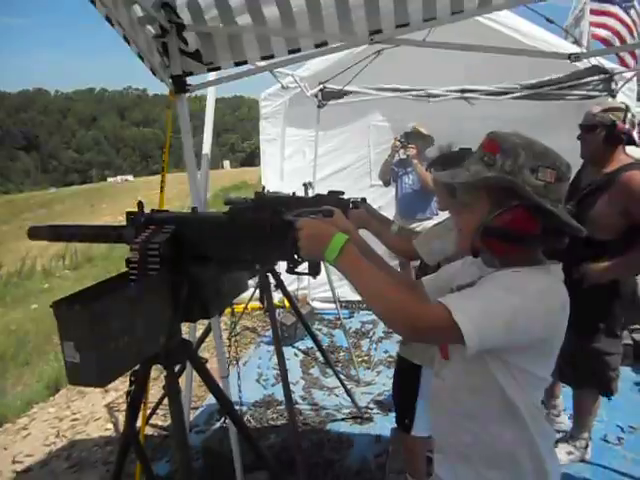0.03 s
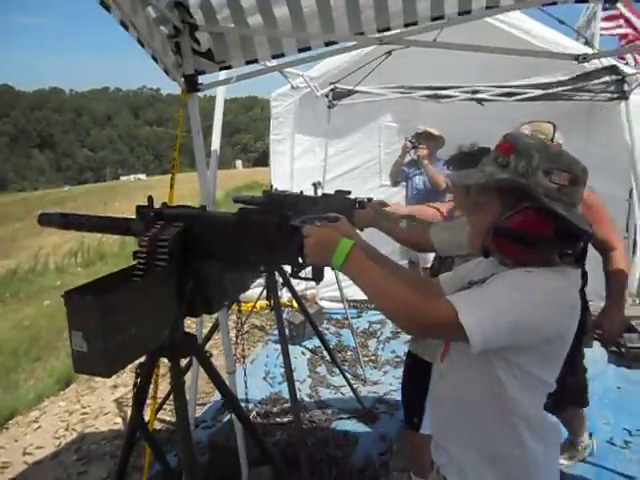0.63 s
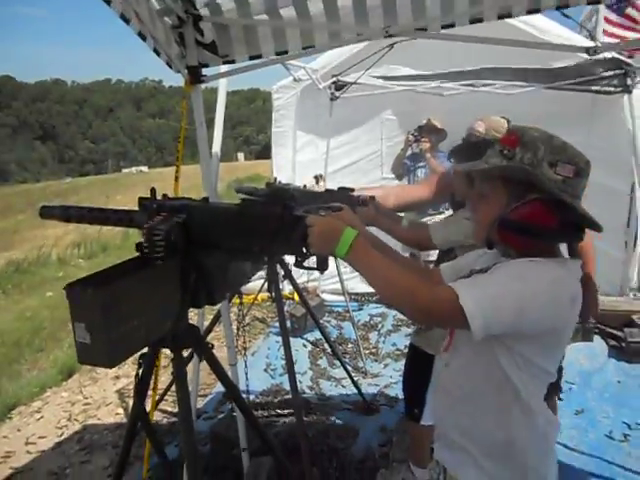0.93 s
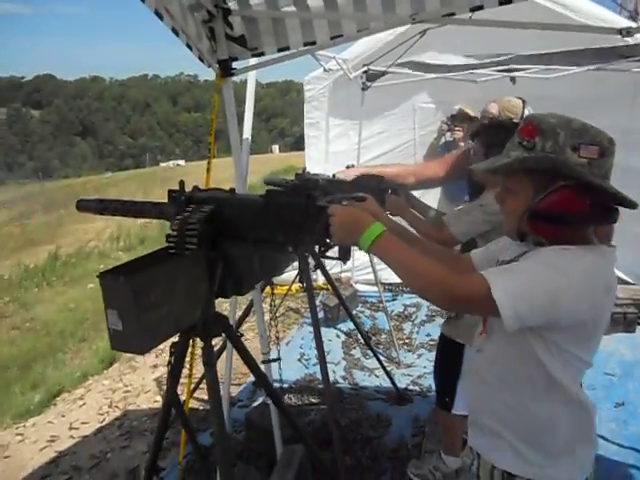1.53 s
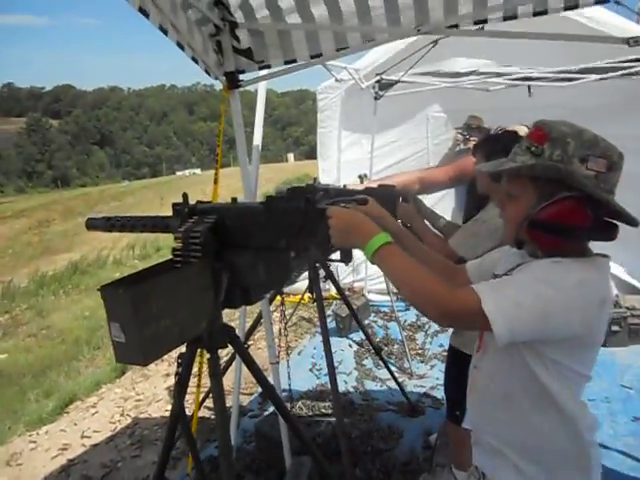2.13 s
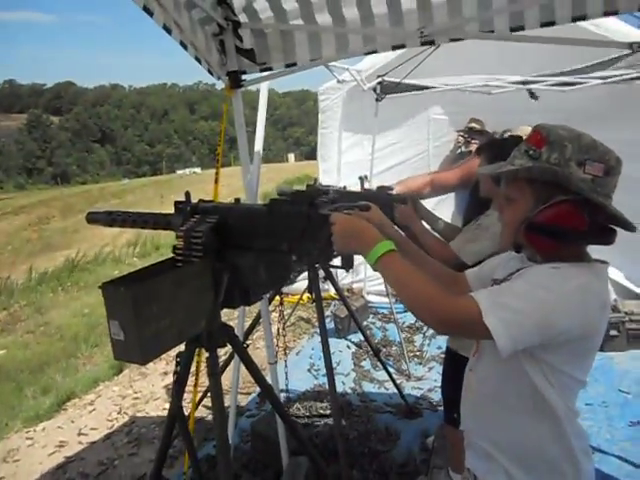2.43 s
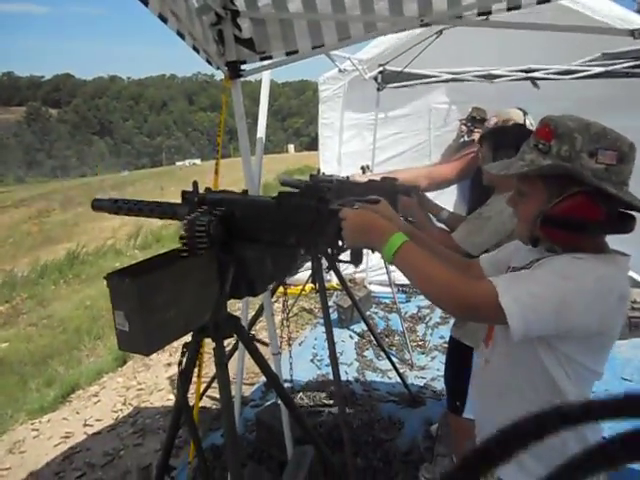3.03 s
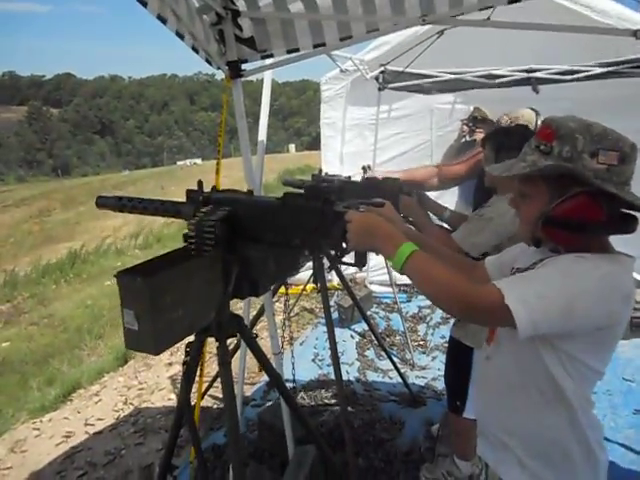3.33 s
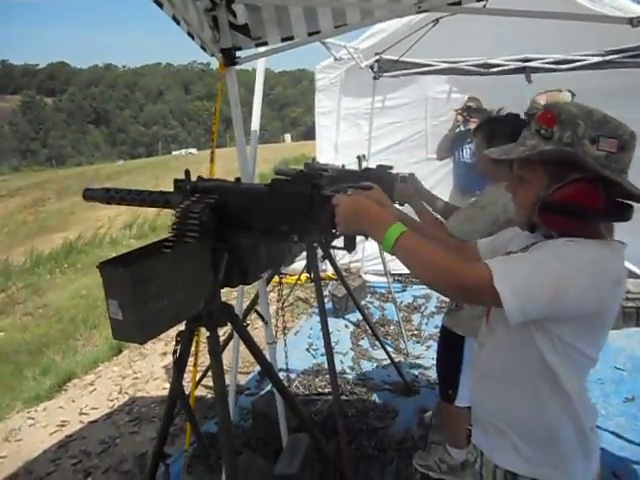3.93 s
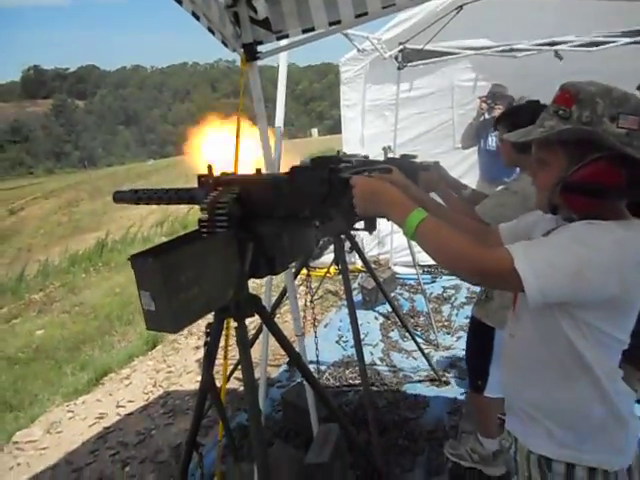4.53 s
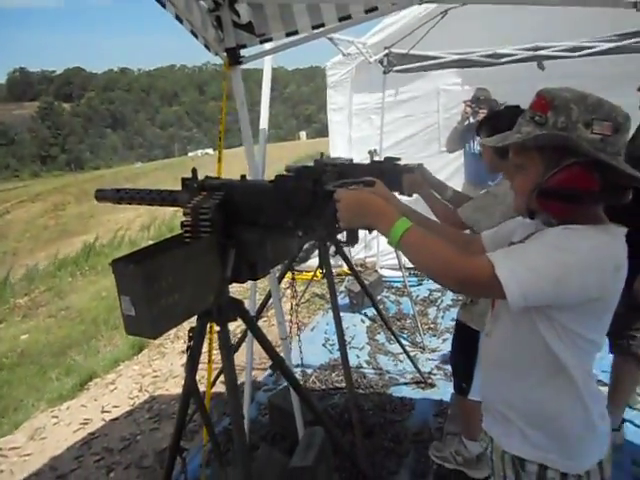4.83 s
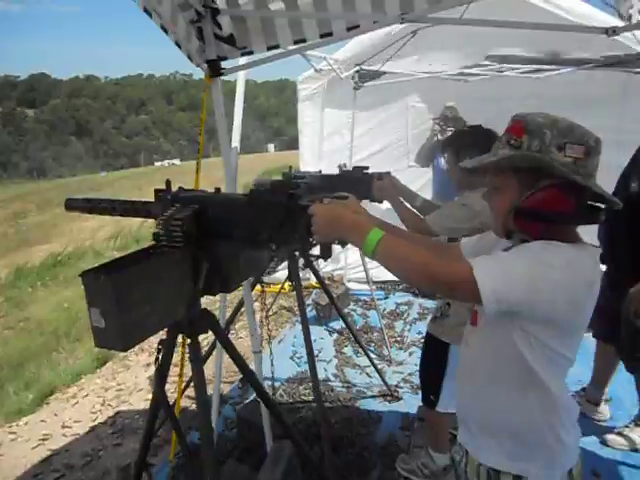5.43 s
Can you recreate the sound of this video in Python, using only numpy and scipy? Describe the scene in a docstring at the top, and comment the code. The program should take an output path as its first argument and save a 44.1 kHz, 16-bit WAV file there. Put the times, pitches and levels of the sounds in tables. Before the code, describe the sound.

A close machine gun fires three harsh, distorted bursts outdoors, a faster gun joining in, with wind buffeting the microphone between bursts.

```python
"""An open firing range, under a canopy, heard through a small camera microphone near a belt-fed machine
gun. It fires three bursts; late in the second, a faster gun down the line joins in. Every blast scatters
off ground, tents and hillside and overloads the microphone into a flat, harsh bark. Wind buffets the
microphone between bursts, spent brass clinks, and the feed squeaks just before each follow-up round."""
import sys
import numpy as np
from scipy import signal
from scipy.fft import rfft, irfft, next_fast_len
from scipy.io import wavfile
from scipy.ndimage import uniform_filter1d, map_coordinates

SR = 44100
rng = np.random.default_rng(int(sys.argv[2]) if len(sys.argv) > 2 else 0)


def wrap_up_sound(samples):
    """Save the sound to the file named by the first command line argument, as 16-bit audio."""
    columns = np.atleast_2d(samples).T
    # keep every value between -1 and 1, then stretch to whole-number steps
    tamed = np.clip(columns, -1, 1)
    steps = np.round(tamed * 32767).astype(np.int16)
    wavfile.write(sys.argv[1], SR, steps)


N = 245637


def amp(db):
    """Decibels to gain."""
    return 10 ** (np.asarray(db) / 20)


def gain_at(points, hz):
    """Gain of (Hz, dB) points joined on a log axis."""
    f, db = np.transpose(points)
    return amp(np.interp(np.log(hz + 1), np.log(f + 1), db))


def wobble(rate):
    """A smooth random curve, rate knots a second."""
    return map_coordinates(rng.standard_normal(int(N * rate / SR) + 4), [np.arange(N) * rate / SR])


def noise(spectrum, size=N):
    """Coloured noise of rms 1."""
    colour = gain_at(spectrum, np.fft.rfftfreq(size, 1 / SR))
    x = irfft(rfft(rng.standard_normal(size)) * colour, size)
    return x / np.sqrt(np.mean(x ** 2) + 1e-20)


def add(track, s, sound):
    """Mix a sound into the track at s seconds."""
    start = max(round(s * SR), 0)
    part = track[start:start + len(sound)]
    part += sound[:len(part)]


# The air over the range. Each row: frequency in Hz, relative level in dB.
AIR_SPECTRUM = [(100, 1), (1000, -2), (3000, -7.5), (6500, -11), (10000, -17), (13000, -35)]
def open_air():
    """A faint, wavering hiss all around."""
    return amp(-51.5 + 3.5 * wobble(8.7)) * noise(AIR_SPECTRUM)


# Wind on the microphone, deep and lumpy. Each row: frequency in Hz, relative level in dB.
WIND_RUMBLE = [(10, -35), (25, 5), (60, -8.5), (110, -12), (250, -39), (1000, -98)]
WIND_BUFFET = [(20, -14), (80, -9), (180, -2), (450, -9.5), (1200, -20), (3000, -33), (10000, -58)]
# Gusts. Each row: arrival in seconds, hold in seconds, relative rumble and buffet levels in dB.
WIND_GUSTS = [(0.086, 0.009, -24, -14), (0.157, 0.037, -11, -11.5), (0.231, 0.046, -17, -17),
              (0.337, 0.028, -18, -23.5), (1.114, 0.87, -29, -32.5), (2.053, 0.14, -29.5, -33),
              (2.359, 0.09, -24, -36.5), (2.605, 0.046, -19.5, -25.5), (2.712, 0.013, -18, -28),
              (3.555, 0.39, -36, -40)]
def wind(attack_s=0.018, release_s=0.015):
    """A light breeze blows on the microphone; gusts build, hold and die away over it."""
    t = np.arange(N) / SR
    breeze = amp(-35.5 + 1.5 * wobble(6.35))
    breeze *= noise(WIND_RUMBLE) + amp(-10.5 + 4.9 * wobble(60)) * noise(WIND_BUFFET)
    rumble = buffet = np.zeros(N)
    for s, hold, rumble_db, buffet_db in WIND_GUSTS:
        swell = np.exp(np.minimum(t - s, 0) / attack_s - np.maximum(t - s - hold, 0) / release_s)
        rumble = np.maximum(rumble, amp(rumble_db + 1) * swell)
        buffet = np.maximum(buffet, amp(buffet_db - 5) * swell)
    lumps = amp(1.7 * wobble(27) + 4 * wobble(110))
    return breeze + rumble * noise(WIND_RUMBLE) + buffet * lumps * noise(WIND_BUFFET)


# The swirl in an eddy. Each row: frequency in Hz, relative level in dB.
EDDY_SWIRL = [(20, -24), (110, -0.5), (250, 0.5), (520, -8.5), (1200, -16.5), (3000, -33), (10000, -51)]
# The hardest eddies. Each row: start in seconds, relative level in dB.
EDDY_HITS = [(0.086, -10.5), (0.162, -5), (0.175, -5), (0.22, -13.5), (0.27, -12), (0.341, -5.5),
             (2.136, -23), (2.427, -23.5)]
def eddies(rise_s=0.0058):
    """Single eddies shove the diaphragm: the pressure rises, then drops as each passes."""
    track, age = np.zeros(N), np.arange(SR // 8) / SR / rise_s
    envelope = age ** 2 * np.exp(1 - age ** 2)
    shove = 1 - age / 2
    for s, db in EDDY_HITS:
        add(track, s, amp(db - 3) * envelope * (noise(EDDY_SWIRL, len(age)) + shove))
    return track


# Gunfire from far off, direct or back from the hillside. Each row: frequency in Hz, relative level in dB.
DISTANT_SPECTRUM = [(30, -12), (200, 7.5), (600, 5.5), (1200, 1), (4500, 1), (9500, -6), (13000, -15)]
# Shots far down the firing line. Each row: start in seconds, relative level in dB.
FAR_SHOTS = [(0.04, -15.5), (0.0809, -13), (2.499, -30.5)]
def far_shots(t60=0.33):
    """Distance smears these shots into soft, quickly fading slaps."""
    track, t = np.zeros(N), np.arange(SR // 2) / SR
    envelope = amp(-5.5 - 60 * t / t60) * (1 - np.exp(-t / 0.0022))
    for s, db in FAR_SHOTS:
        add(track, s - .003, amp(db) * envelope * noise(DISTANT_SPECTRUM, len(t)))
    return track


# Modes of a brass case. Each row: frequency in Hz, relative level in dB, seconds to fade by 60 dB.
CASE_MODES = [(6175, 3, 0.11), (7100, -8, .1), (8650, -18, .1), (11100, 1, .18)]
# Cases and belt links landing. Each row: start in seconds, relative level in dB.
LANDINGS = [(0.0914, -36), (0.1424, -30), (1.8595, -23.5), (1.968, -38), (2.0767, -37), (2.222, -39),
            (2.279, -33.5), (2.609, -35)]
def spent_brass(tick_t60=0.088):
    """Each landing ticks and rings the brass at new strengths."""
    track, t = np.zeros(N), np.arange(SR // 4) / SR
    for s, db in LANDINGS:
        ring = np.zeros(len(t))
        for hz, mode_db, t60 in CASE_MODES:
            decay = amp(mode_db + rng.normal(0, 3.4) - 60 * t / t60)
            ring += decay * np.sin(2 * np.pi * hz * rng.normal(1, 0.0059) * t)
        tick = amp(-9 - 60 * t / tick_t60) * noise(CRACK_SPECTRUM, len(t))
        add(track, s, amp(db) * (amp(-18) * ring + tick))
    return track


def feed_squeaks(bursts, squeak_hz=6930, rise_s=0.009, lead_s=0.021):
    """Steel slides on steel as each next round is fed: a brief high note in a faint scrape."""
    track, t = np.zeros(N), np.arange(SR // 20) / SR
    stroke = (t / rise_s) ** 2 * np.exp(1 - (t / rise_s) ** 2)
    for burst in bursts:
        for s, _ in fire([burst])[1:]:
            note = np.sin(2 * np.pi * squeak_hz * rng.normal(1, .006) * t)
            scrape = amp(-3.5) * noise(CRACK_SPECTRUM, len(t))
            add(track, s - lead_s, amp(rng.normal(-31, 2.5)) * stroke * (note + scrape))
    return track


def fire(bursts):
    """(seconds, dB) of every round: each follows the last after one cycle of the action."""
    rounds = []
    for first, count, db, cycle in bursts:
        gaps = np.interp(np.linspace(0, 1, count - 1), np.linspace(0, 1, len(cycle)), cycle)
        rounds += [(s, db) for s in first + np.append(0, np.cumsum(gaps))]
    return rounds


# A shot's bright crack, also the colour of ticks and scrapes. Each row: frequency in Hz, relative dB.
CRACK_SPECTRUM = [(30, -14), (200, -15.5), (1000, -7.5), (2500, -1.5), (5000, 0.5), (9500, 0.5),
                  (13000, -10)]
def blasts(rounds, echo_spectrum, crack_db, crack_t60, echo_db, echo_t60,
           hill_t60, slap_delay_s, slap_db, alike):
    """Each round: a crack, dense echoes off ground and tents, one dull slap and the hillside's answer."""
    track, t, late = np.zeros(N), np.arange(SR // 4) / SR, np.arange(SR) / SR
    crack = amp(crack_db - 60 * t / crack_t60)
    echoes = amp(echo_db - 60 * t / echo_t60) * (1 - np.exp(-t / 0.0096))
    hill = amp(-20.5 - 60 * late / hill_t60) * (1 - np.exp(-late / 0.05))
    dull = noise([(100, 5.5), (400, 4), (900, -7.5), (2000, -43), (10000, -19)], len(t))
    slap = amp(slap_db - 60 * t / 0.053) * dull
    for envelope, spectrum in ((crack, CRACK_SPECTRUM), (echoes, echo_spectrum)):
        # the surroundings stand still, so part of the pattern repeats from round to round
        same = np.sqrt(alike) * noise(spectrum, len(t))
        for s, db in rounds:
            fresh = np.sqrt(1 - alike) * noise(spectrum, len(t))
            add(track, s, amp(db) * envelope * (same + fresh))
    for s, db in rounds:
        add(track, s + slap_delay_s, amp(db) * slap)
        add(track, s, amp(db) * hill * noise(DISTANT_SPECTRUM, len(late)))
    return track * amp(0.78 * wobble(260))  # echoes arrive in clumps


# The faster gun's dense echoes. Each row: frequency in Hz, relative level in dB.
FAST_ECHOES = [(30, -7), (130, -4.5), (220, 4), (320, -8), (460, 0), (850, -1), (1300, 0), (1600, -1.5),
               (2150, 2), (2800, -1.5), (4500, -3), (9500, -6), (13000, -22)]
# Its burst. Each row: start in seconds, rounds, relative level in dB, seconds per round from start to end.
FAST_FIRE = [(3.9935, 24, 0.3, [.0689, .0632, .0671, .0665, .0698, .0636])]
def fast_gun():
    """Down the line, one long burst at about 900 rounds a minute."""
    return blasts(fire(FAST_FIRE), FAST_ECHOES, crack_db=8.5, crack_t60=0.046, echo_db=5, echo_t60=0.1,
                  hill_t60=0.76, slap_delay_s=0.036, slap_db=-19, alike=0.23)


# The near gun's dense echoes. Each row: frequency in Hz, relative level in dB.
NEAR_ECHOES = [(30, -2), (135, -5), (192, 5), (255, -5.5), (400, -3), (600, -0.5), (1250, -1), (1700, -3),
               (2400, -1), (4500, -3.5), (9500, -9), (13000, -14)]
# Its bursts. Each row: start in seconds, rounds, relative level in dB, seconds per round as it drifts.
NEAR_FIRE = [(0.3759, 12, -2, [.1234, .1277, .1259, .128, .1188, .1258]),
             (2.7269, 12, -2.3, [.1271, .1299, .1295, .1262, .131, .1329]), (4.899, 6, -2.5, [.1251])]
def near_gun():
    """Close to the microphone, the belt-fed gun cracks out about 470 rounds a minute."""
    return blasts(fire(NEAR_FIRE), NEAR_ECHOES, crack_db=18.5, crack_t60=0.054, echo_db=9.5,
                  echo_t60=0.11, hill_t60=0.54, slap_delay_s=0.06, slap_db=-17.5, alike=0.19)


def scene():
    """The weather, the far end of the range and both guns, from one spot under the canopy."""
    background = open_air() + wind() + eddies() + far_shots()
    return (background + spent_brass() + feed_squeaks(NEAR_FIRE) + fast_gun() + near_gun())[None]


def overload(x, ceiling_db=-9, hardness=2.86, bias_db=-16):
    """The input stage saturates; while it does, its bias shifts and adds a thump."""
    drive = np.abs(x) / amp(ceiling_db)
    saturated = uniform_filter1d((drive > 1) * 1., size=64)
    return x / (1 + drive ** hardness) ** (1 / hardness) + amp(bias_db) * saturated


# The small microphone's response. Each row: frequency in Hz, gain in dB.
MIC_RESPONSE = [(100, 1.5), (1000, 1.5), (3000, 0.88), (7000, -1), (10000, -3), (10450, -2.5),
                (10900, -15.5), (11500, -14.5), (12400, -24.5)]
def record(dry, start_s=.037, low_hz=24, top_hz=12400):
    """The camera starts, clips the blasts, blocks their steady offset and cuts the high treble."""
    clipped = overload(dry[0]) * (np.arange(N) > start_s * SR)
    centred = signal.sosfilt(signal.butter(1, low_hz, "highpass", fs=SR, output="sos"), clipped)
    size = next_fast_len(N + SR // 2)
    hz = np.fft.rfftfreq(size, 1 / SR)
    response = gain_at(MIC_RESPONSE, hz) / (1 + (hz / top_hz) ** 120)
    return irfft(rfft(centred, size) * response, size)[None, :N]


dry = scene()
out = record(dry)
wrap_up_sound(out)
```